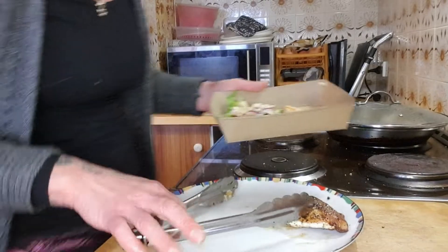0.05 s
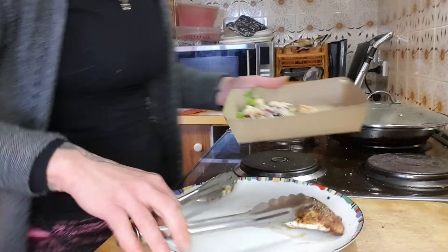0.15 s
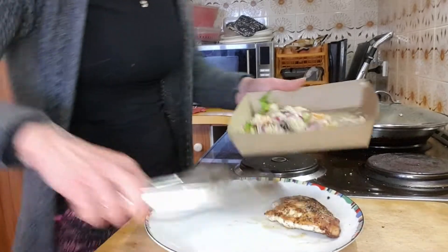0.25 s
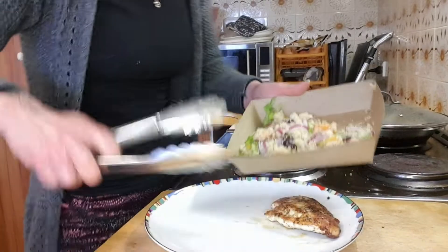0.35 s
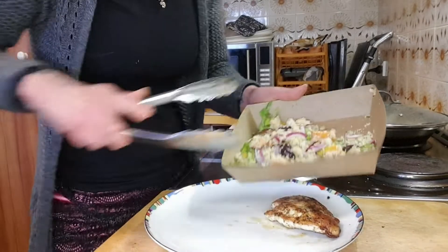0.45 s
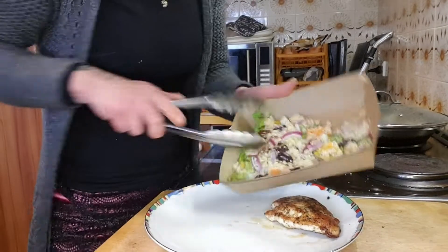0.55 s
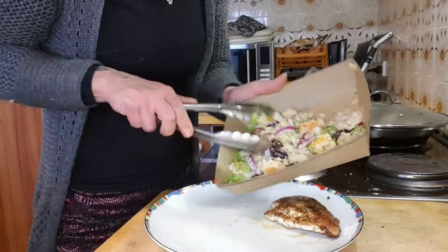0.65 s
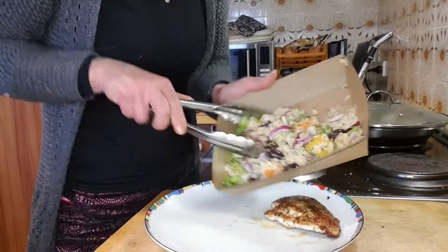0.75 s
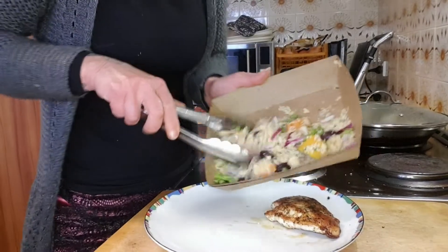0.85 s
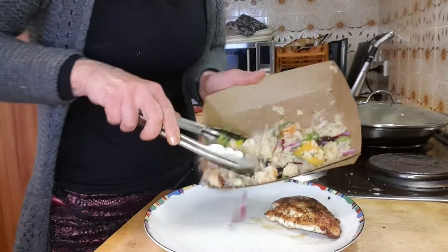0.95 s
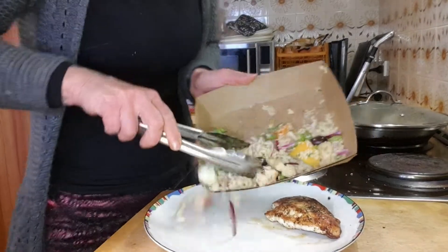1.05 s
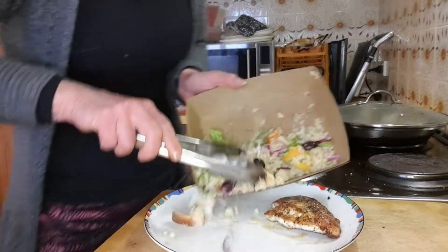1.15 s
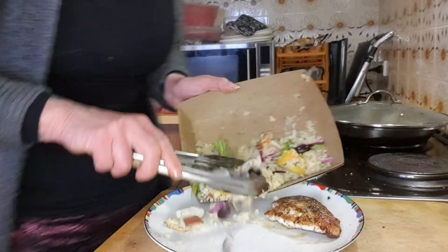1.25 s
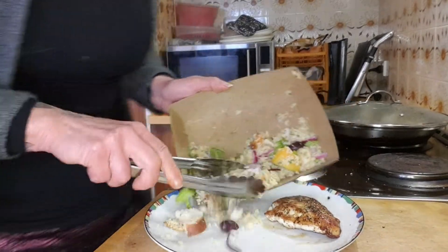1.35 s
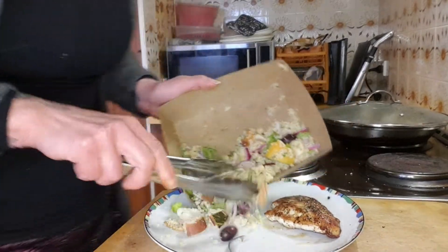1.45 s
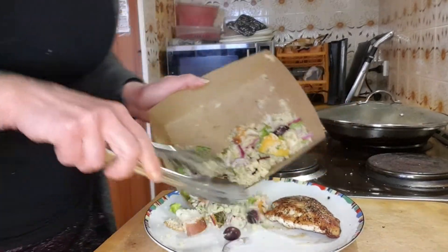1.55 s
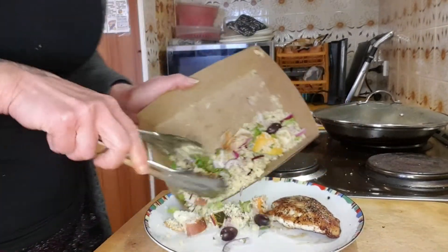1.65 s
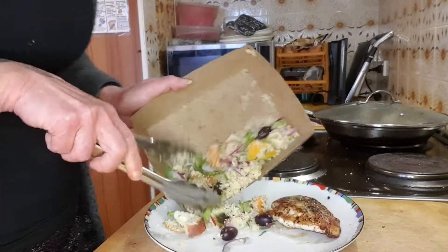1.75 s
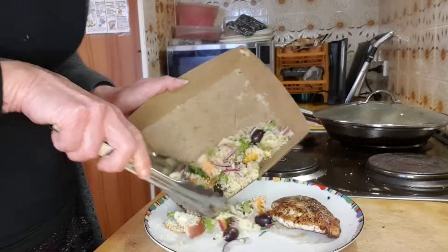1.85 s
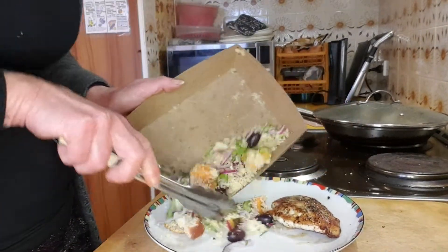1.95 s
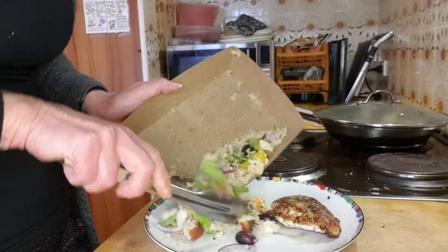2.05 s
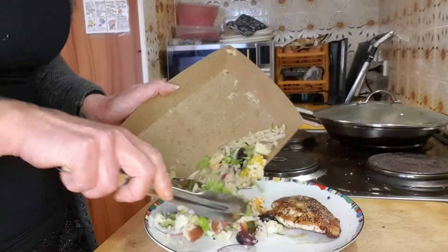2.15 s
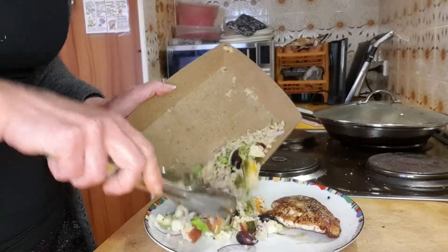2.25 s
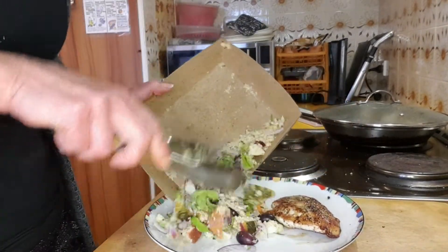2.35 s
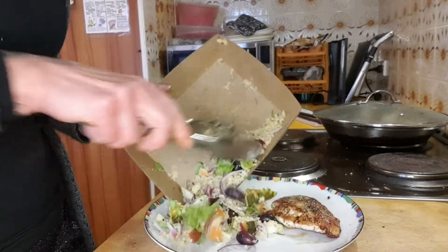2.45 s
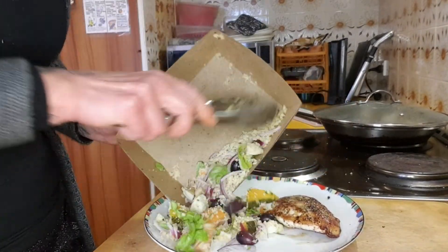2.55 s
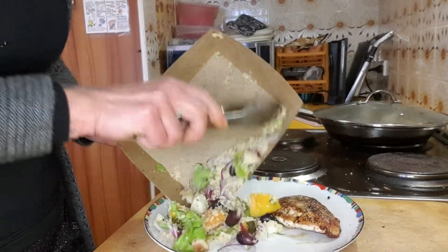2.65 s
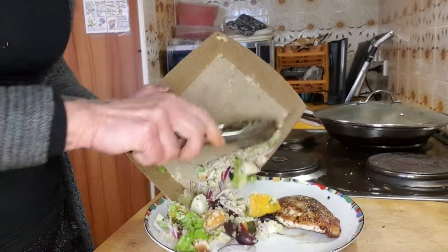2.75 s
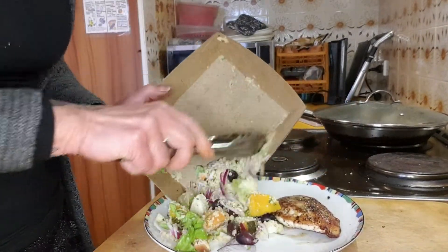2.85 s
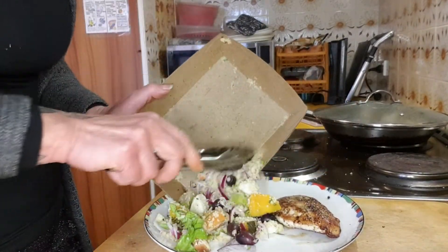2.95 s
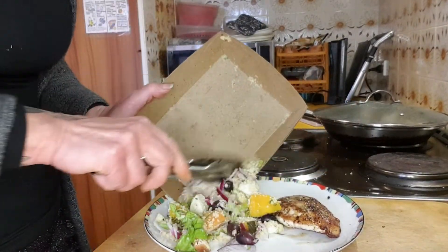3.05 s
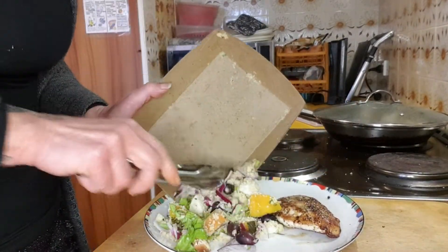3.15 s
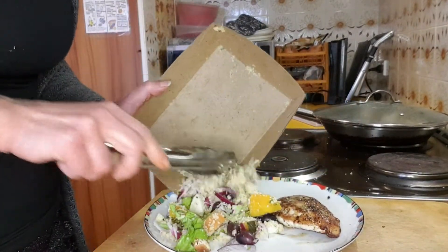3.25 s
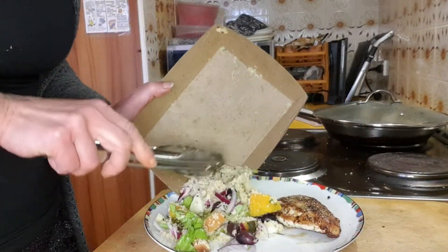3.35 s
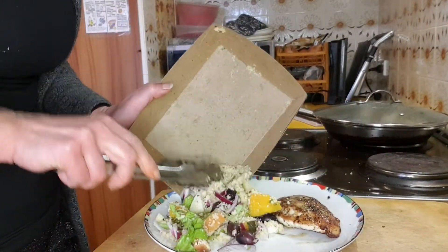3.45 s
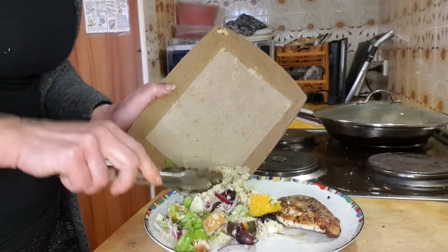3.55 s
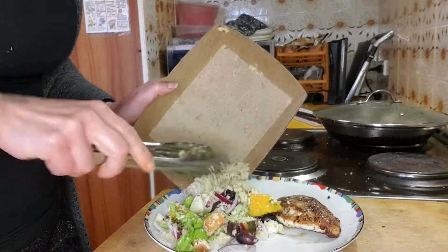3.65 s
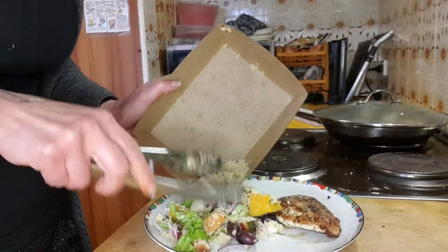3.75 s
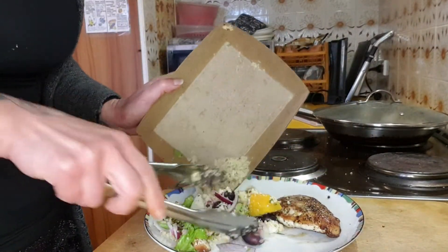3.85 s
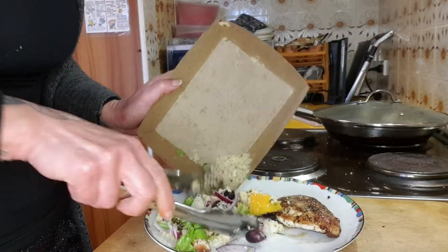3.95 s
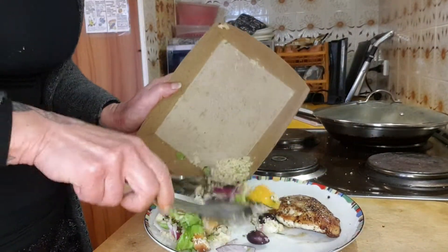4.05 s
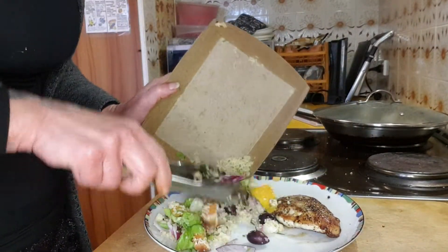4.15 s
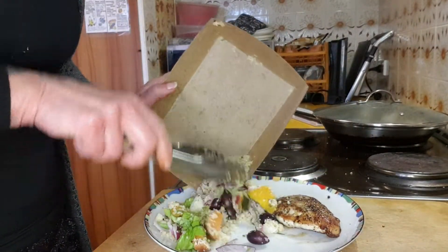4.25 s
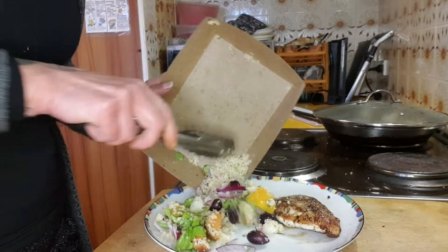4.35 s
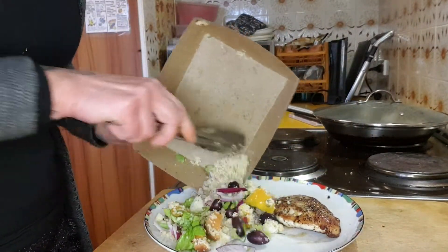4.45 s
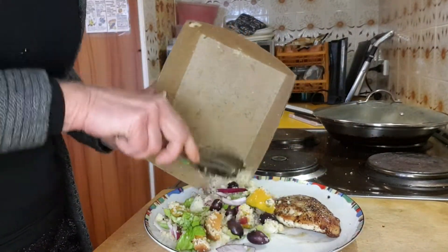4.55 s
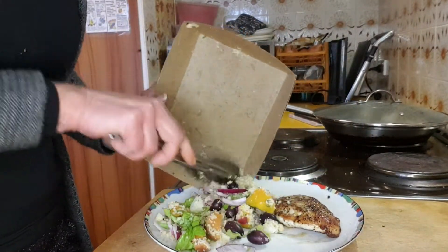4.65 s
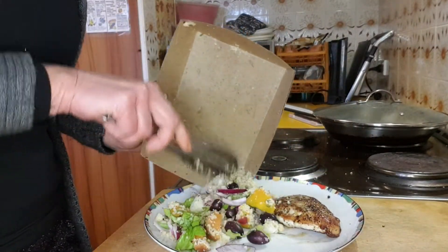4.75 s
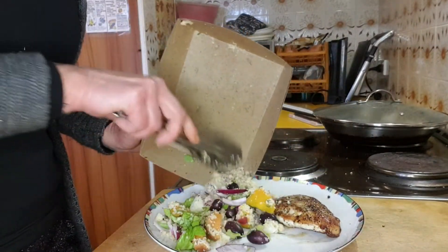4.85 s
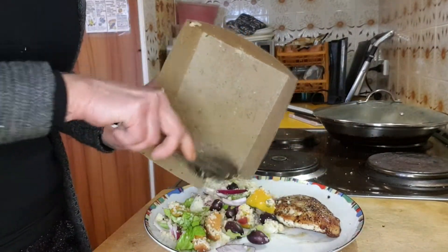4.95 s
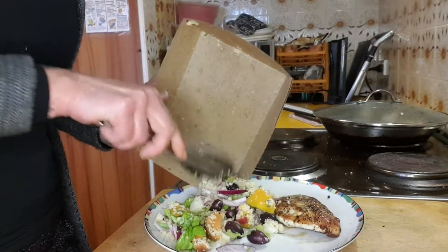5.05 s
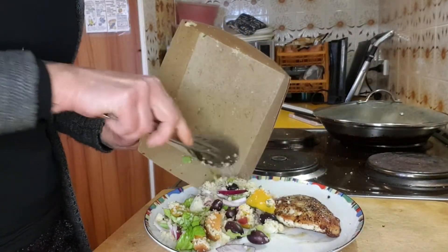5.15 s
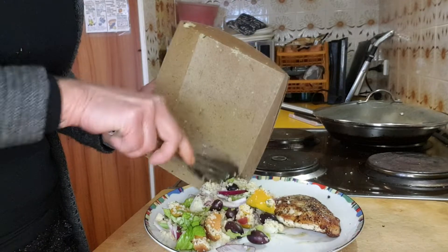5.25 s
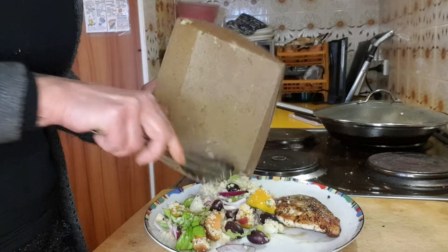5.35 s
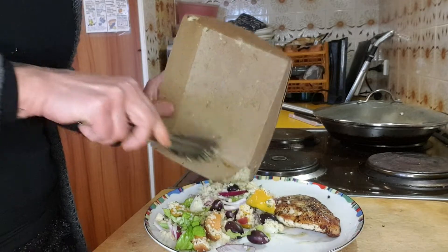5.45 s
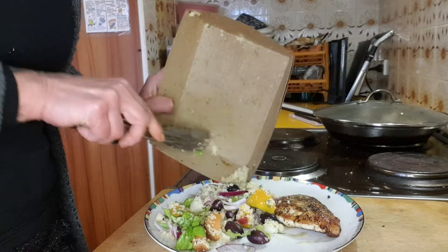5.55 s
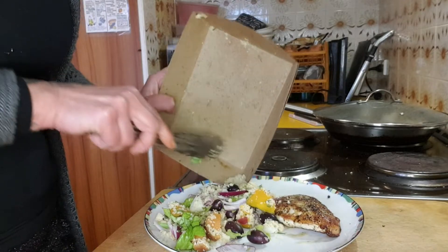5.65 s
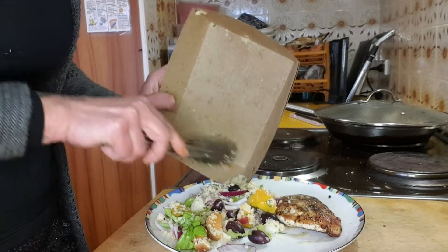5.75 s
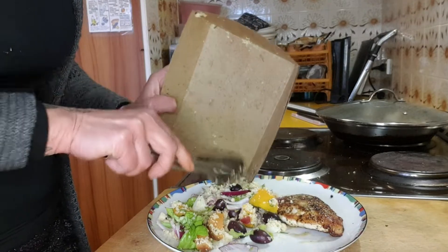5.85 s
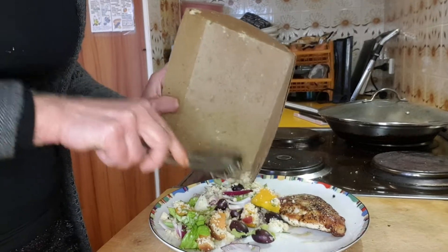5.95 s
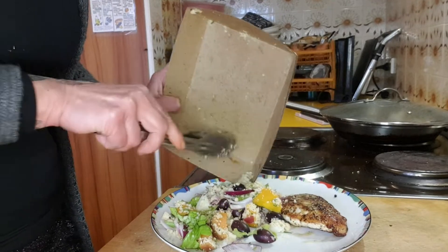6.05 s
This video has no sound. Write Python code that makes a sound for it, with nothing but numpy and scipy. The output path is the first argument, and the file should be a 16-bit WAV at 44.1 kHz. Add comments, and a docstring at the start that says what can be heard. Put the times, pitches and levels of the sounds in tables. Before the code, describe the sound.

A small tiled kitchen, heard close in stereo, with everything slightly left and short bright reflections. At 0 s steel tongs strike a china plate with a hard clack and brief ring, skid off it, and click thinly at about 0.27 s. Behind, a lidded pan sizzles softly with crackling fine hiss and low bubbling. From 0.4 to 2.2 s light scrapes brush cardboard, with dull knocks near 0.65, 1.25 and 1.75 s. A longer scrape and soft low thump come at 2.7 s. The sizzle swells to about 3 s, flares in quick spurts until 3.5 s, then stays strong. At 4.03 s the tongs snap with a loud bright crack. Firm hollow box knocks follow at 4.5, 4.9, 5.3 and 5.6 s, with small fat spits, muffled bubble thuds and the strongest papery scrapes from 5.6 to 5.9 s, the frying continuing to the end.

```python
"""A lidded frying pan sizzles on the stove of a small tiled kitchen and grows louder: tiny steam bursts ring
pan and lid, larger drops spit, and bubbles thud in the hollow under the lid.
Nearer by, steel tongs leave a china plate, click, and knock and scrape salad out of a cardboard box:
blows ring sets of decaying modes, and scraping is a stream of tiny slips coloured like cardboard."""
import sys
import numpy as np
from scipy import signal
from scipy.fft import rfft, irfft, next_fast_len
from scipy.io import wavfile
from scipy.ndimage import uniform_filter1d

SR = 44100
rng = np.random.default_rng(int(sys.argv[2]) if len(sys.argv) > 2 else 0)


def bounce(signal):
    """Save signal as a 16-bit WAV file at the path given by the first command-line argument."""
    frames = np.transpose(np.atleast_2d(signal))
    limited = np.clip(frames, -1, 1)
    pcm = np.round(limited * 32767).astype(np.int16)
    wavfile.write(sys.argv[1], SR, pcm)


N = 269451
TIME = np.arange(N) / SR   # [s]
KITCHEN_T60_S = 0.25


def amp(db):
    """Decibels to gain."""
    return 10 ** (np.asarray(db) / 20)


def rms_one(x):
    """Scale so that the mean of the channels has rms 1."""
    middle = np.atleast_2d(x).mean(axis=0)
    return x / np.sqrt(np.mean(middle ** 2) + 1e-20)


def peak_one(x):
    """Scale to a peak of 1."""
    return x / (np.abs(x).max() + 1e-20)


def at_hz(points, hz):
    """Read a spectrum on a log-frequency axis."""
    f, value = np.transpose(points)
    return np.interp(np.log(np.maximum(hz, 1)), np.log(f), value)


def colour(x, points, power=1):
    """Give a sound a smooth spectrum; power scales its decibels."""
    size = next_fast_len(N + SR // 10)
    hz = np.arange(size // 2 + 1) * SR / size
    gain = amp(at_hz(points, hz)) ** power
    return irfft(rfft(x, size) * gain, size)[..., :N]


def cut(x, hz, kind):
    """Butterworth filter of order 2 (per edge for a band)."""
    sos = signal.butter(2, np.clip(hz, 10, .47 * SR), kind, fs=SR, output="sos")
    return signal.sosfilt(sos, x + 1e-18)


def drift(rate):
    """Slow random wander with spread 1, computed at every 40th sample; rate in Hz."""
    r = np.exp(-80 * np.pi * rate / SR)
    noise = rng.standard_normal(N // 40 + 2002)
    slow = signal.lfilter([1], [1, -2 * r, r * r], noise)[2000:]   # skip the settling
    return np.interp(np.arange(N) / 40, np.arange(len(slow)), rms_one(slow))


def resonate(x, hz, width):
    """One resonance with gain 1 on top; hz and width in Hz."""
    r = np.exp(-np.pi * width / SR)
    zeros = np.array([1, 0, -1]) * (1 - r * r) / 2
    poles = [1, -2 * r * np.cos(2 * np.pi * hz / SR), r * r]
    return signal.lfilter(zeros, poles, x + 1e-18)


def grains(per_s, spread_db):
    """Random clicks of either sign, many small and a few large."""
    born = np.flatnonzero(rng.random(N) < per_s / SR)
    size_db = spread_db * np.minimum(rng.exponential(1, born.size), 5)
    out = np.zeros(N)
    out[born] = amp(size_db) * rng.choice([-1, 1], born.size)
    return out


def struck(modes, vary_db):
    """One blow: every mode rings with a strength of its own and dies at its own rate."""
    hz, db, t60 = np.transpose(modes)[:, :, None]
    t = TIME[:SR // 2]
    level_db = db + vary_db * rng.standard_normal(hz.shape) - 60 * t / t60
    return np.sum(amp(level_db) * np.sin(2 * np.pi * hz * t), axis=0)


def add(out, s, sound):
    """Mix a sound in at time s."""
    i = max(round(s * SR), 0)
    out[i:i + len(sound)] += sound[:N - i]


def kitchen(x, wet_db, lag_s=0., shared_hz=450):
    """Direct sound, later at the right ear by lag_s, plus tile reflections alike at both ears only in the bass."""
    t = TIME[:SR // 2]
    dense = np.clip(0.02 + (t / .04) ** 2, 0, 1)   # sparse early echoes thicken into a tail
    echoes = rng.standard_normal((3, len(t))) * (rng.random((3, len(t))) < dense) / np.sqrt(dense)
    echoes *= amp(-60 * t / KITCHEN_T60_S) * (t > .001)
    echoes /= np.sqrt(np.sum(echoes ** 2, axis=1, keepdims=True))
    tail = cut(echoes[:2], shared_hz, "high") + cut(echoes[2], shared_hz, "low")
    late = np.roll(np.append(x, np.zeros(SR)), round(lag_s * SR))[:N]
    direct = np.array([x, late])
    return direct + amp(wet_db) * signal.fftconvolve(x[None], tail, axes=1)[:, :N]


# Hiss of the fat: (frequency [Hz], density [dB per Hz, relative])
FAT_HISS = [(500, -25.5), (1300, -20.5), (2100, -18), (2750, -14), (3400, -3), (5000, -1), (6000, 0),
            (7400, 1.5), (8800, -3), (10400, 0), (12000, -0.5), (13100, -0.5), (15700, -1)]
# Ringing of pan and lid, before the common ring level: (frequency [Hz], width [Hz], level [dB])
PAN_RING = [(3652, 56, 7), (3814, 40, -0.5), (4130, 25, 5), (4470, 32, 4.5), (4820, 150, -13.5),
            (5770, 180, -1.5), (7460, 16, -15), (7300, 92, -13.5), (11680, 100, -7.5)]


def sizzle(hiss_db, spray_db, flicker_db=3.0, sputter_db=1.6, count=3, ring_db=-5):
    """Water flashes to steam at spots in the fat: thousands of tiny bursts in flurries ring pan and lid."""
    edges = np.geomspace(400, 19000, num=11)   # Hz; each band flickers by itself
    heard = 0
    for spot in range(count):
        bursts = 0
        for low, high in zip(edges, edges[1:]):
            band = cut(grains(per_s=3200, spread_db=5.5), [low, high], "band")
            bursts = bursts + band * amp(flicker_db * drift(24))
        bursts = colour(bursts * amp(sputter_db * drift(11.8)), FAT_HISS)
        ring = sum(amp(db) * resonate(bursts, hz, width) for hz, width, db in PAN_RING)
        bursts = bursts + amp(ring_db) * ring
        heard = heard + kitchen(bursts, wet_db=3.0, lag_s=.00026 + .00007 * spot)
    spray = colour(heard, [(7000, -40), (8000, -12), (9500, 0)])   # the treble alone
    return amp(hiss_db) * rms_one(heard - spray) + amp(spray_db) * rms_one(spray)


# Air resonances under the lid, relative: (frequency [Hz], width [Hz], level [dB])
LID_AIR = [(279, 42, 0.5), (323, 32, -37), (580, 7.3, -27), (885, 26, -11.5), (969, 51, -6),
           (1498, 43, -9.5), (1800, 150, -28), (2410, 38, -6.5)]
# Simmering carried by the stove: (frequency [Hz], density [dB per Hz, relative])
STOVE_RUMBLE = [(20, -34), (40, -1), (62, 0), (80, -1.5), (100, -2), (135, -8), (170, -14), (205, -15.5),
                (260, -14), (600, -34.5), (1500, -39)]
# The biggest bubbles under the lid, before the room: (time [s], peak level [dB])
BIG_BUBBLES = [(1.13, -45.5), (2.583, -46), (2.808, -40.5), (4.635, -37), (5.44, -43.5), (5.575, -35.5)]


def simmer(heat_db):
    """Bubbles burst in the hollow under the lid; the stove carries their rumble."""
    pops = grains(per_s=760, spread_db=2.0)
    fizz = grains(per_s=1200, spread_db=6.0)
    hollow = 0
    for k, (hz, width, db) in enumerate(LID_AIR):
        drive = pops if k < 2 else fizz   # pops feed the two lowest resonances
        hollow = hollow + amp(db) * resonate(rms_one(drive), hz, width)
    rumble = colour(grains(per_s=400, spread_db=4.0), STOVE_RUMBLE)
    steady = amp(-12.0) * rms_one(kitchen(hollow, wet_db=5.5))
    steady = steady + amp(-14.5) * rms_one(kitchen(rumble, wet_db=2.5))

    big, t = np.zeros(N), TIME[:SR // 4]
    swell = (1 - np.exp(-t / 0.003)) * np.exp(-t / 0.007)
    thud = peak_one(swell * np.sin(2 * np.pi * LID_AIR[0][0] * t))
    for s, db in BIG_BUBBLES:
        add(big, s, amp(db) * thud)
    return amp(heat_db) * steady + kitchen(big, wet_db=-3.0)


# Tongs on the plate, before the room and the left-right tilt: (time [s], peak level [dB],
# contact cut-off [Hz], skid time constant [s], decay constant of the ring under the resting tongs [s])
PLATE_TOUCHES = [(0.0003, -11.5, 2200, 0.00016, 0.2), (0.035, -33, 3000, 0.009, 0.15),
                 (0.176, -36, 1100, 0.008, 0.035), (0.318, -44, 1200, 0.006, 0.025)]
# Plate on the worktop, ringing freely: (frequency [Hz], level [dB], t60 [s])
PLATE_MODES = [(352, 1, .15), (385, -15, .09), (768, -3, .32), (805, 3, .028), (980, -10, .05),
               (1047, -15, .2), (1154, -15, .13), (1380, -17, .11), (1453, -15, .13), (1538, -13, .19),
               (2050, -20, .05), (2993, -17, .09), (3456, -26, .09), (4210, -18, .08)]
# The plate rocks on the worktop: (time [s], peak level [dB], frequency [Hz], swell and decay constant [s])
PLATE_ROCK = (0.15, -47, 80, 0.018)
PLATE_PAN_DB = 1.5   # left raised and right lowered by this


def plate(clack_db=-10, clack_s=0.017):
    """Tongs bump the china and skid over it as they are picked up; the plate rocks once on the worktop."""
    out, t = np.zeros(N), TIME[:SR // 2]
    for s, db, contact_hz, skid_s, damp_s in PLATE_TOUCHES:
        chatter = rng.standard_normal(len(t)) * t * np.exp(-t / skid_s)
        touch = chatter if skid_s > .001 else np.ones(1)   # a clean blow is a single push
        clack = amp(clack_db) * rng.standard_normal(len(t)) * np.exp(-t / clack_s)
        damped = (struck(PLATE_MODES, vary_db=1.2) + clack) * np.exp(-t / damp_s)
        ring = cut(signal.fftconvolve(damped, touch), contact_hz, "low")
        add(out, s, amp(db) * peak_one(cut(ring, 900, "high")))   # a small plate radiates little bass
    s, db, hz, length_s = PLATE_ROCK
    add(out, s, amp(db) * peak_one(t * np.exp(-t / length_s) * np.sin(2 * np.pi * hz * t)))
    return kitchen(out, wet_db=-5.5, lag_s=0.00035) * amp([[PLATE_PAN_DB], [-PLATE_PAN_DB]])


# Tong jaws meeting, before the room and the left-right tilt: (time [s], peak level [dB],
# dullness: low-pass cut-off [Hz], thinness: high-pass cut-off [Hz])
JAW_CLICKS = [(0.0195, -23.5, 6000, 3600), (0.0245, -26, 6000, 3600), (0.265, -18.5, 14000, 5500),
              (4.0278, -4, 17100, 1400), (4.0284, -7, 13000, 1400)]
# Steel arms: (frequency [Hz], level [dB], t60 [s])
ARM_MODES = [(1352, -14, 0.071), (1400, -19, 0.1), (2334, -5.5, 0.047), (3610, -22, 0.055),
             (4420, -12, 0.029), (5070, -13, 0.019), (6020, -16, 0.032), (7230, -6, 0.01),
             (9440, -23, 0.024), (10900, -3.5, 0.037), (13600, -28, 0.013), (14100, -6, 0.016),
             (13820, -2.5, 0.016), (15630, -5, 0.023)]


def tongs(crack_db=-5, crack_s=0.0079, thin_crack_hz=2000):
    """The jaws snap together: a bright crack, then the ring of the arms, damped by the hand."""
    out = np.zeros(N)
    for s, db, dull_hz, thin_hz in JAW_CLICKS:
        arms = struck(ARM_MODES, vary_db=1.2)
        crack = cut(rng.standard_normal(len(arms)), thin_crack_hz, "high")
        crack *= amp(crack_db) * np.exp(-TIME[:len(arms)] / crack_s)
        click = cut(cut(arms + crack, dull_hz, "low"), thin_hz, "high")
        add(out, s, amp(db) * peak_one(click))
    return kitchen(out, wet_db=-9, lag_s=.00023) * amp([[.6], [-.6]])


# Sweeps of the tongs over the cardboard, before the room: (start time [s], length [s],
# level at the end of the sweep [dB], frequency at which the touched panel sings [Hz])
SWEEPS = [(0.397, 0.093, -59, 1100), (0.644, 0.064, -51, 2150), (0.784, 0.16, -50.5, 1010),
          (1.823, 0.19, -57, 1300), (2.136, 0.1, -55.5, 920), (2.683, 0.33, -51.5, 1000),
          (3.551, 0.063, -48, 1700), (4.28, 0.058, -56, 1020), (4.51, 0.092, -51, 575),
          (4.944, 0.11, -49.5, 1410), (5.597, 0.13, -38.5, 1300), (5.745, 0.1, -44, 905),
          (5.863, 0.057, -43, 1700)]
# Rasp of the cardboard: (frequency [Hz], density [dB per Hz, relative])
CARDBOARD_RASP = [(40, 4), (70, 9), (130, 2.5), (200, 5), (320, -2.5), (450, 2.5), (660, 1.5), (900, 5.5),
                  (1120, -2), (1500, -1.5), (2100, -1.5), (2700, -2.5), (4000, 3), (12000, -32.5)]
PRESS_DB = 1.5   # the hand bears down this much harder by the end of a sweep
SLIDE_DB, SLIDE_S = -14.5, 0.2   # then loosened food slides on and comes to rest (decay constant)
FULL_HZ, EMPTY_HZ = 178, 25   # the food damps the box's bass below this; it booms more as it empties


def scraping(grip_db=2.5, sing_db=-0.5, sing_share=0.26):
    """Steel sticks and slips over cardboard fibres and grains of food; the panel under the tip sings along."""
    slips = colour(grains(per_s=1100, spread_db=1.5) * amp(grip_db * drift(70)), CARDBOARD_RASP)
    out = np.zeros(N)
    for start, length, db, hz in SWEEPS:
        age = TIME - start
        push = amp(PRESS_DB * (np.clip(age / length, 0, 1) - 1.0))
        slide = amp(SLIDE_DB) * np.exp(-np.maximum(age - length, 0) / SLIDE_S)
        force = amp(db) * (age >= 0) * np.where(age < length, push, slide)
        damped_hz = np.interp(start, [0, TIME[-1]], [FULL_HZ, EMPTY_HZ])
        singing = slips + amp(sing_db) * resonate(slips, hz, sing_share * hz)
        stroke = rms_one(cut(singing, damped_hz, "high"))
        out += stroke * uniform_filter1d(force, size=SR // 45)   # the pressure builds and eases
    return kitchen(out, wet_db=0.5, lag_s=.0001)


# The loudest spits of fat, before the room: (time [s], level [dB], frequency [Hz])
FAT_SPITS = [(0.403, -42.5, 4240), (0.575, -42.5, 3950), (1.436, -47, 11000), (3.95, -36, 11800),
             (4.809, -37, 4440), (4.943, -34, 5600), (5.404, -48, 3280)]
SPIT_S = 0.013   # a spurt is strongest at half this time


def spits(width_share=0.3):
    """A larger drop boils off in one short spurt: noise around one pitch that swells and dies."""
    out, age = np.zeros(N), 2 * TIME[:SR // 5] / SPIT_S
    for s, db, hz in FAT_SPITS:
        spurt = rng.standard_normal(len(age))
        for _ in range(2):
            spurt = resonate(spurt, hz, width_share * hz)
        add(out, s, amp(db) * age * np.exp(1 - age) * rms_one(spurt))
    return kitchen(out, wet_db=-2.5, lag_s=.0003)


# Tongs knocking in the box, before the bass cut and the room: (time [s], peak level [dB],
# contact cut-off [Hz], flexing of the whole box [dB])
BOX_KNOCKS = [(0.657, -29.5, 900, -13), (1.248, -30.5, 750, 5), (1.754, -32, 750, 2),
              (2.683, -37, 2000, 11), (4.035, -28, 646, -1), (4.5007, -18, 1320, 0.5),
              (4.9016, -20, 3000, 7), (5.258, -29.5, 900, 3), (5.294, -25, 4000, 6),
              (5.6187, -18, 2620, -8)]
# Cardboard box, the first three modes flexing it whole: (frequency [Hz], level [dB], t60 [s])
BOX_MODES = [(58.8, -6.5, 0.35), (106, -14, 0.19), (148, -7, 0.069), (212.6, -16, 0.17), (284.4, -2, 0.048),
             (442, -4, 0.053), (576.5, -3.5, 0.081), (667, -7.5, 0.068), (893, 0.5, 0.035),
             (1214, 5.5, 0.0099), (1495, -5.5, 0.058), (2020, -22, 0.014), (3670, -39, .02)]
REBOUND_S, REBOUND_DB, REBOUND_HZ = 0.057, -12.5, 537   # the box springs back on the tongs: delay, level, cut-off


def box_knocks(rattle_db=-9, rattle_s=0.069):
    """Each knock and its rebound ring the panels, shake the loose food and flex the whole box in its low modes."""
    out, t = np.zeros(N), TIME[:SR // 2]
    rebounds = [(s + REBOUND_S, db + REBOUND_DB, REBOUND_HZ, flex_db) for s, db, _, flex_db in BOX_KNOCKS]
    for s, db, contact_hz, flex_db in list(BOX_KNOCKS) + rebounds:
        panels = struck(BOX_MODES[3:], vary_db=1.8)
        flex = amp(flex_db) * struck(BOX_MODES[:3], vary_db=1.2)
        rattle = amp(rattle_db) * cut(rng.standard_normal(len(t)), 4800, "low") * np.exp(-t / rattle_s)
        knock = cut(panels + flex + rattle, contact_hz, "low")
        add(out, s, -amp(db) * peak_one(knock))
    return kitchen(cut(out, 42, "high"), wet_db=-6)


# Vigour of the frying, before the trims: (time [s], hiss level [dB], fine spray level [dB])
FRYING_VIGOUR = [(0.0, -49.5, -49), (0.65, -54, -54.5), (0.88, -52, -52), (1.17, -49.5, -46),
                 (1.68, -53, -51.5), (1.99, -50, -50), (2.35, -47, -46.5), (2.72, -44.5, -44.5),
                 (2.93, -40.5, -40), (3.23, -44, -39), (3.54, -43, -41.5), (3.83, -41, -39),
                 (4.63, -41.5, -42), (5.48, -41.5, -39.5), (5.75, -41, -38), (6.11, -43, -40.5)]
HISS_TRIM_DB, SPRAY_TRIM_DB = -0.65, 0.1
# Juice runs into the fat and the whole sizzle flares: (time at the top [s], length [s], rise of the hiss [dB])
JUICE_FLARES = [(1.295, 0.021, 5), (2.235, 0.076, 4), (3.091, 0.031, 5), (3.194, 0.025, 5),
                (3.314, 0.12, 5), (3.444, 0.03, 3.5), (4.38, 0.083, 2.5)]
SPRAY_FOLLOWS = 0.29   # share of a flare's rise that the fine spray takes
# Left over right, before each side takes its share: (frequency [Hz], level [dB])
LEFT_LEAN = [(60, 2.5), (200, 6.5), (400, 1.5), (800, 5), (2400, 7), (4400, 4), (7100, 8), (8900, 3),
             (10300, 7.5), (11700, 9), (13200, 6), (15000, 3.5)]


def scene():
    """The pan behind, the serving in front, all a little to the left."""
    s, hiss_db, spray_db = np.transpose(FRYING_VIGOUR)
    hiss_db = np.interp(TIME, s, hiss_db) + HISS_TRIM_DB
    spray_db = np.interp(TIME, s, spray_db) + SPRAY_TRIM_DB
    heat_db = uniform_filter1d((hiss_db + spray_db) / 2, SR // 3)   # the simmer follows the frying slowly
    flare_db = sum(rise * np.exp(-(2 * (TIME - top) / length) ** 2) for top, length, rise in JUICE_FLARES)
    pan = sizzle(hiss_db + flare_db, spray_db + SPRAY_FOLLOWS * flare_db) + simmer(heat_db) + spits()
    left, right = pan + plate() + tongs() + scraping() + box_knocks()
    left = colour(left, LEFT_LEAN, power=0.57)
    right = colour(right, LEFT_LEAN, power=-0.38)
    return amp(-0.58) * np.array([left, right])


CUTOFF_HZ = 15850


def record(dry):
    """The deepest bass is rolled off, the highest peaks rounded, the top cut steeply."""
    rounded = .7 * np.tanh(cut(dry, 36, "high") / .7)
    return signal.sosfilt(signal.ellip(12, .1, 80, CUTOFF_HZ, fs=SR, output="sos"), rounded)


dry = scene()
out = record(dry)
bounce(out)
```